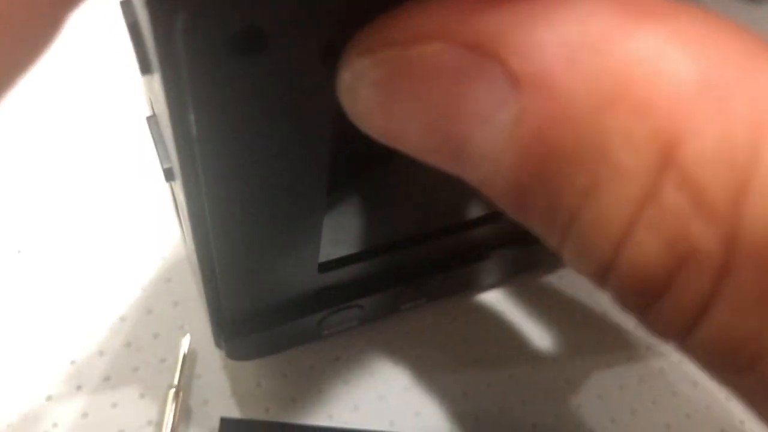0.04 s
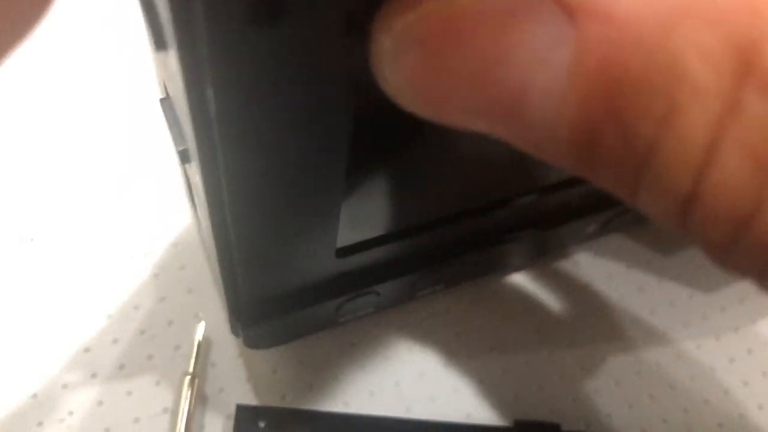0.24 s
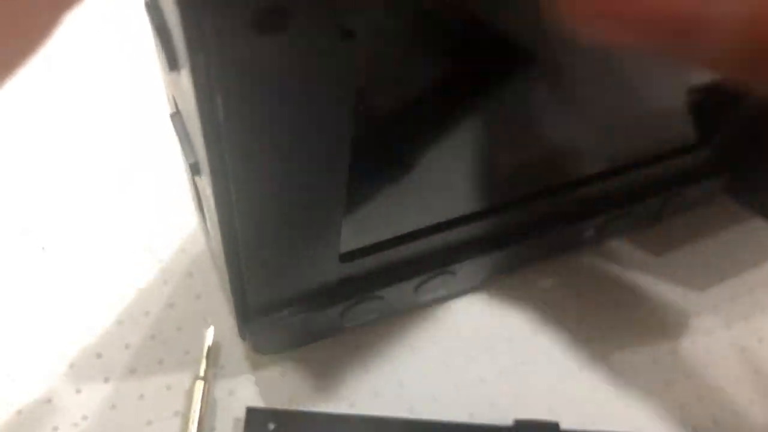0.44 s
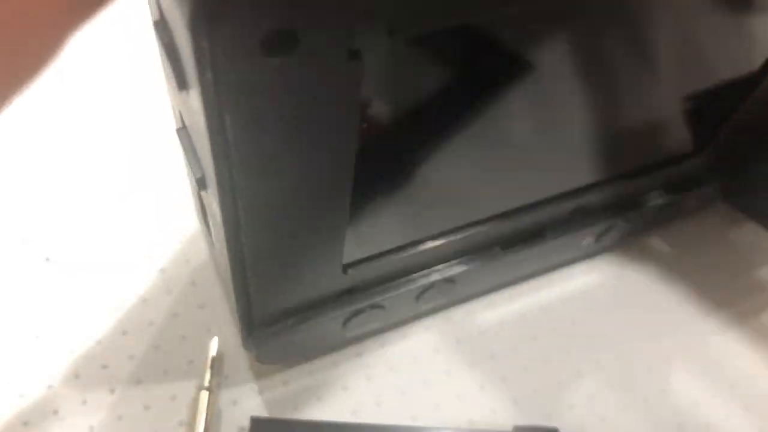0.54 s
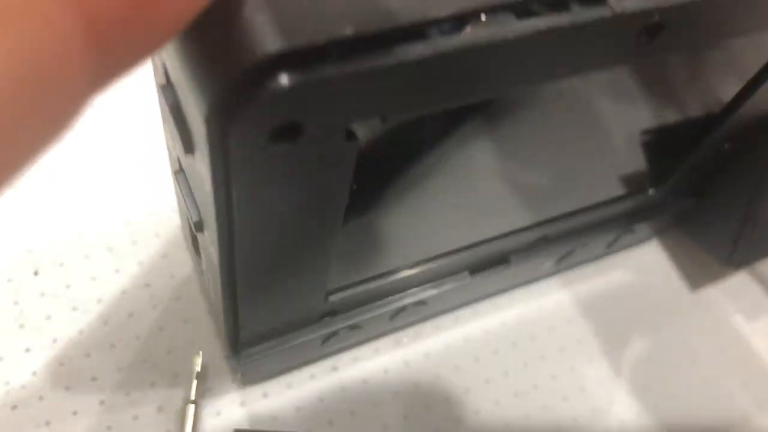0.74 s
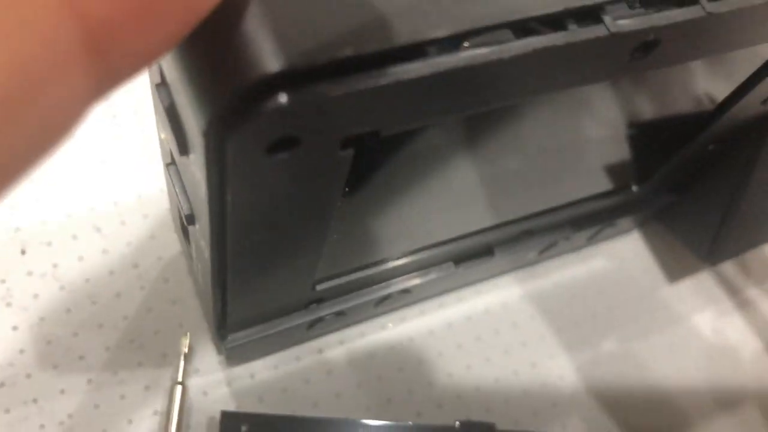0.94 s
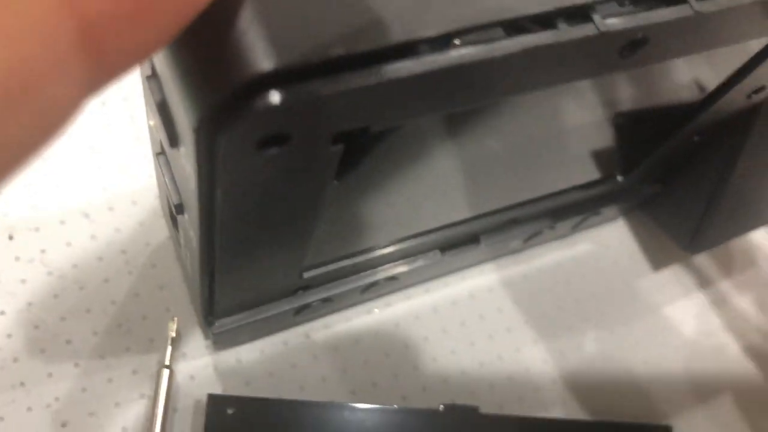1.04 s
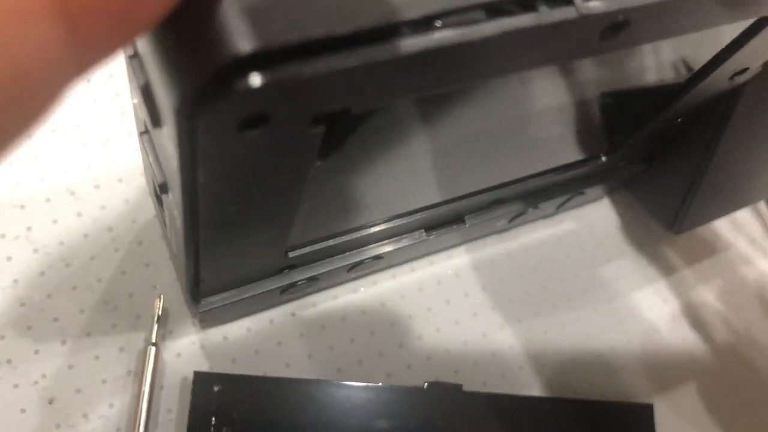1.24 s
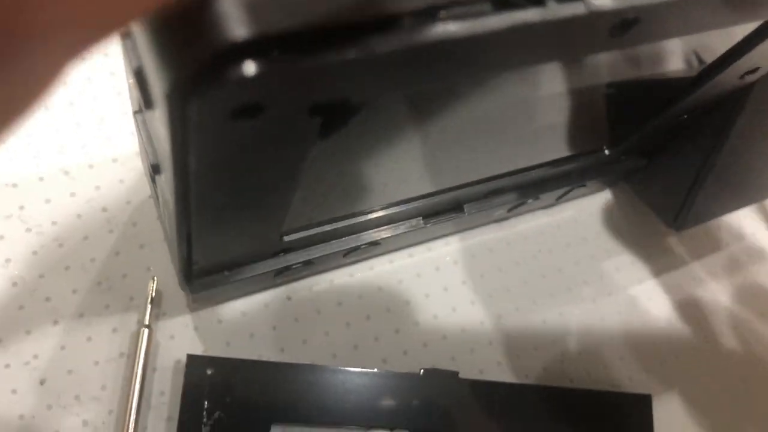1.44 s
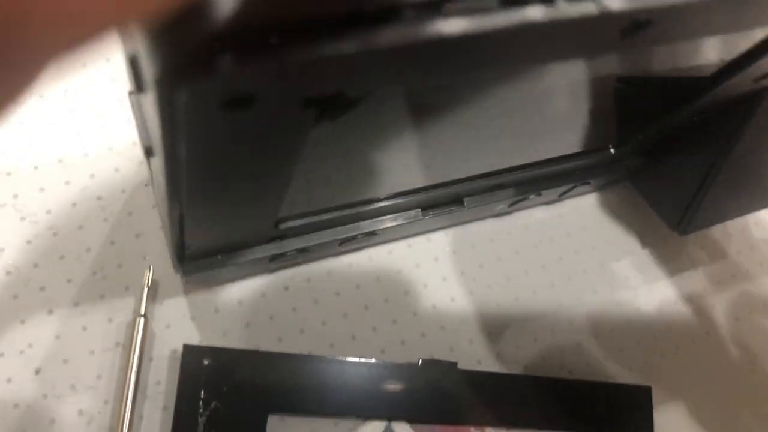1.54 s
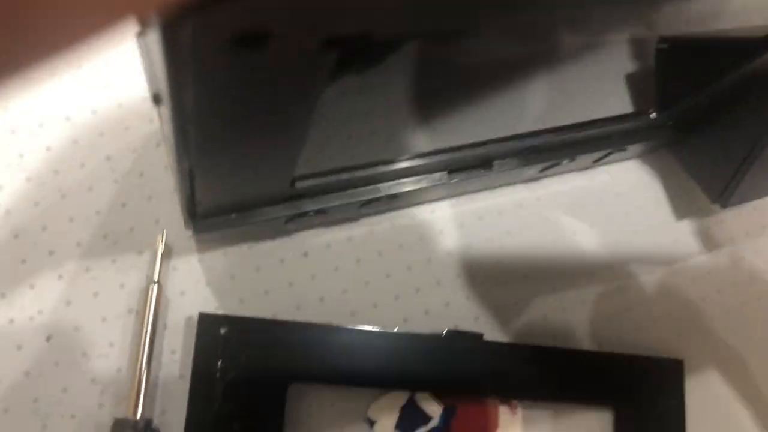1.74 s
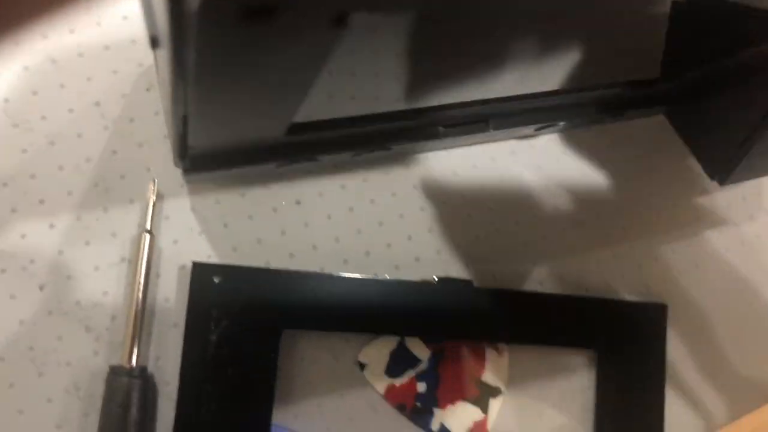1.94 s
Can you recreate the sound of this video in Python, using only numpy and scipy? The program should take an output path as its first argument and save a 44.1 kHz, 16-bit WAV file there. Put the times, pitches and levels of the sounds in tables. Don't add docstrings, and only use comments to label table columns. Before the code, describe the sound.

Plastic casing of a small device clicks, snaps and pops as fingers pry it apart

```python
import sys
import numpy as np
from scipy import signal
from scipy.fft import rfft, irfft, next_fast_len
from scipy.io import wavfile
from scipy.ndimage import uniform_filter1d

SR = 44100
rng = np.random.default_rng(int(sys.argv[2]) if len(sys.argv) > 2 else 0)


def voltage_ratio(decibels):
    exponent = np.asarray(decibels, float) / 20
    return 10 ** exponent


def dump(signal):
    limited = np.clip(np.atleast_2d(signal).T, -1, 1)
    pcm = np.round(limited * 32767).astype(np.int16)
    wavfile.write(sys.argv[1], SR, pcm)


N = 88200

# centre in Hz, width in Hz, level in dB.
CLIP_MODES = [(1199, 200, -14.5), (1844, 160, -6.5), (2164, 180, -0.5), (3223, 350, -2), (4825, 480, 5),
              (6036, 450, -1), (6920, 500, -11.5), (8314, 1200, -0.5), (9310, 750, -6.5), (10040, 350, -2),
              (11500, 610, -6.5), (12470, 550, -3.5), (14780, 350, -8), (15940, 400, -10)]
CATCH_MODES = [(910, 190, -2.5), (1770, 170, -11.5), (2272, 250, -0.5), (3234, 260, -6.5),
               (3720, 130, -7.5), (5100, 250, -7), (5700, 230, -8.5), (6400, 240, -13.5), (7510, 340, -10),
               (8840, 720, -10.5), (11000, 280, -22.5), (12420, 410, -14.5), (15400, 440, -20.5)]
LID_MODES = [(285, 150, -9.5), (495, 130, -5), (758, 260, -3), (1150, 220, -7.5), (1659, 220, -1),
             (2403, 150, -1), (2790, 380, 3), (3220, 300, -3), (5085, 910, 3.5), (7110, 440, -2),
             (8240, 500, 2), (10100, 1100, -1), (11675, 250, -0.5), (13645, 720, 0)]
BASE_MODES = [(386, 270, -6), (699.5, 450, 2.5), (1056, 300, -10), (1590, 250, -13), (1830, 140, -14.5),
              (2270, 370, -12.5), (5550, 500, -32)]
HOLLOW_MODES = [(227, 120, -4.5), (475.6, 120, -5), (614, 150, -9), (745, 150, -9), (1145, 133, 2),
                (1546, 120, -7), (1930, 400, -4), (2174, 124, -0.5)]
SHELL_MODES = [(2840, 790, -5), (3540, 440, -7), (4122, 170, -2.5), (5190, 290, -0.5), (5440, 180, 1),
               (5840, 180, 2), (6470, 310, -2.5), (6930, 570, -3), (8220, 400, -3), (9120, 480, -3),
               (10570, 720, -9.5), (11240, 670, -6), (13570, 800, -16)]
EDGE_MODES = [(1653, 280, 1.5), (2320, 350, 4.5), (3020, 400, 5.5), (3654, 400, 5.5), (4430, 420, 2),
              (5560, 500, -6), (6430, 600, -5), (7400, 450, -8.5), (8500, 600, -25), (9500, 530, -20),
              (11600, 810, -25)]
RIM_MODES = [(2380, 450, -1), (3190, 450, 1), (3900, 370, -1), (4700, 500, -1), (5900, 800, -8),
             (7600, 500, -7), (8900, 800, -11), (11500, 900, -20)]
# centre in Hz, width in Hz, level in dB.
PANEL_MODES = [(1750, 150, -8), (2250, 160, 1.5), (3250, 200, -3), (4650, 200, -2), (5570, 220, 1),
               (6040, 130, 4.5), (6970, 46, 3.5), (7310, 240, -5), (7900, 98, -9), (10140, 120, 1),
               (11400, 46, -8.5), (12600, 50, 0.5), (13700, 80, -3.5)]
BEZEL_MODES = [(750, 180, -3.5), (1850, 130, 2.5), (2200, 200, -3.5), (4490, 230, 2), (5150, 340, -3),
               (6560, 280, -5), (9150, 530, -5), (11500, 540, -15.5)]

# start in seconds, peak level in dB, chatter length in ms, tilt in dB per octave.
CLIP_SNAPS = [
    (.2155, -45.5, 1.2, 0.5),
    (.2278, -53, 1.2, 1),
    (.2365, -56, 0.69, -2.5),
    (.2497, -15.5, 2, 0.5),
    (.2535, -33, 1.6, -3.5),
]
CATCH_SNAPS = [
    (.0935, -51, 3.4, -2),
    (.1569, -32, 1.4, 0),
]
LID_POPS = [
    (.4324, -26.5, 3.4, -2.5),
    (.4368, -7.5, 2.5, .5),
    (.4402, -24.5, 1.3, -3.5),
    (.4525, -37, 5.4, -1),
]
BASE_KNOCKS = [
    (.358, -56.5, 13, 8),
    (.3840, -24, 3.27, -0.5),
    (.3895, -32.5, 3.3, 2.5),
    (.770, -49, 4.9, 5),
    (1.365, -56, 3.98, 0),
    (1.415, -45, 6.34, 9),
    (1.662, -55.5, 5.9, 0),
]
HOLLOW_CLACKS = [
    (.770, -51, 6.1, 0.16),
    (1.414, -54, 8.5, 1),
    (1.7243, -43.5, 3.3, 1),
    (1.7398, -18.5, 2.63, 0.38),
    (1.7495, -36, 2.9, -2),
]
SHELL_CLACKS = [
    (1.416, -63.5, 5.14, -0.1),
    (1.7243, -50, 2.4, 0),
    (1.7392, -21, 1.44, 0.62),
    (1.7418, -30.5, 1.9, -2.9),
    (1.7495, -44.5, 3, -2.3),
]
EDGE_TICKS = [
    (1.2068, -61.5, 3.4, 1),
    (1.3660, -58, 3.5, -5.5),
    (1.6629, -35, 4, -1),
]
RIM_TICKS = [
    (1.7675, -47.5, 3, 2),
    (1.8175, -49, 2.9, 2),
    (1.829, -51, 3, 4),
    (1.9812, -41.5, 4.1, -2.5),
]
LID_TICKS = [
    (.0265, -58.5, 2.7, 4),
    (.034, -63, 2, 4),
    (.047, -61, 2.2, 4),
    (.0795, -60, 3.5, 1),
    (.102, -67, 3, 2),
    (.268, -44, 4.4, 1),
    (.415, -44, 6, 1),
]

# start in seconds, length in seconds, level in dB, tilt in dB per octave.
STROKES = [(.001, 0.12, -67, -6.5), (.02, 0.07, -72, 11), (0.167, 0.058, -90, 7), (0.259, 0.068, -62, -2.5),
           (0.315, 0.12, -62, -3.5), (0.346, 0.081, -60.5, -13), (0.388, 0.072, -53.5, -4),
           (0.783, 0.037, -66.5, -3), (0.888, 0.038, -72.5, -4), (0.954, 0.014, -67.5, -6.5),
           (0.992, .02, -69.5, -6.5), (1.108, 0.089, -66, -4), (1.239, 0.066, -60, -6),
           (1.408, 0.013, -59.5, -9.5), (1.669, 0.06, -63, -4), (1.729, 0.0064, -57.5, -4),
           (1.759, 0.071, -56.5, -4.5), (1.818, 0.092, -62.5, -5.5), (1.882, 0.045, -52.5, -1.5),
           (1.9, .07, -64.5, -3), (1.967, 0.064, -60.5, -5)]
# time in seconds, level in dB.
THUMB_SLIDE = [
    (0.46, -61),
    (0.508, -56.5),
    (0.638, -49.5),
    (0.702, -52),
    (0.75, -59.5),
    (0.768, -60),
    (0.782, -80),
]
# start in seconds, level in dB, pitch in Hz.
TABLE_PUSHES = [
    (0.091, -66.5, 69),
    (.386, -58, 90),
    (0.438, -55, 75),
    (1.75, -56, 103),
]
# start in seconds, centre in Hz, level in dB, 60 dB decay in seconds.
PANEL_BUZZES = [
    (.255, 2250, -55, 0.28),
    (.39, 750, -55, 0.2),
    (.443, 645, -51, 0.35),
    (0.444, 1720, -55, .3),
    (.443, 2720, -57, .35),
    (0.444, 3750, -51, .4),
    (1.104, 4500, -71.5, 0.35),
    (1.75, 2000, -59.5, 0.55),
    (1.75, 470, -54, 0.19),
    (1.75, 1150, -56, 0.24),
]

# frequency in Hz, 60 dB decay in seconds.
ROOM_DECAY = [(200, 0.12), (800, 0.24), (2200, 0.37), (5000, 0.38), (14000, 0.13)]
# frequency in Hz, level in dB.
ROOM_COLOUR = [(200, 9), (600, 5), (1200, -10), (2200, 0.2), (3700, -2.1), (5000, -6), (14000, -2)]
# frequency in Hz, spectral density in dB per Hz.
ROOM_HUM = [(25, -21), (75, -4), (260, -5.5), (320, -11.5), (2100, -18), (2700, -28), (7000, -34.5),
            (15000, -41.5)]


def unit(x):
    return x / np.sqrt(np.mean(x ** 2) + 1e-20)


def along(points, hz):
    f, v = np.transpose(points)
    return np.interp(np.log(hz + 1), np.log(f + 1), v)


def filtered(x, response):
    m = next_fast_len(len(x) + 4096)
    return irfft(rfft(x, m) * response(np.fft.rfftfreq(m, 1 / SR)), m)[:len(x)]


def add(track, s, x):
    part = track[max(round(s * SR), 0):][:len(x)]
    part += x[:len(part)]


def tilted(hz, tilt_db):
    return voltage_ratio(tilt_db * np.log2((hz + 30) / 3000))


def patchy(n, patchy_db, size):
    z = signal.stft(rng.standard_normal(n + 512), nperseg=256)[2]
    field = uniform_filter1d(rng.standard_normal(z.shape), size, 0)
    field = uniform_filter1d(field, size, 1)
    return signal.istft(z * voltage_ratio(patchy_db * unit(field)), nperseg=256)[1][:n]


def strikes(contacts, modes):
    lag_cycles, rise_cycles, min_width_hz = 1.252, 0.81, 180
    crack_db, crack_t60 = -6.5, 0.011
    rattle_db, rattle_t60, rattle_tilt_db = -14.5, 0.04, -3.5
    out, t = np.zeros(N), np.arange(SR // 12) / SR
    hz, width, level_db = np.transpose(modes)[:, :, None]
    width = np.maximum(width, min_width_hz)
    lag = lag_cycles / hz
    for s, db, chatter_ms, tilt_db in contacts:
        span, tilt_db = chatter_ms / 1000, np.clip(tilt_db, -4, 4)

        late = np.clip(t - lag - span * 0.22 * rng.random(hz.shape), 0, None)
        free = np.clip(t - lag - span * 0.73, 0, None)
        swell = (1 - np.exp(-late * hz / rise_cycles)) * np.exp(-np.pi * width * free)
        gain = voltage_ratio(level_db + rng.normal(0, 0.8, hz.shape)) * np.sqrt(width / 300) * tilted(hz, tilt_db)
        ring = np.sum(gain * swell * np.sin(2 * np.pi * hz * late), axis=0)

        def colour(f):
            resonance = gain * f / (np.abs(hz ** 2 - f ** 2) + f * width)
            return np.sqrt(np.sum(resonance ** 2, axis=0))

        after = np.clip(t - span, 0, None)
        crack = unit(filtered(rng.standard_normal(len(t)), colour))
        crack = crack * voltage_ratio(crack_db - 60 * after / crack_t60)
        rattle = patchy(len(t), 0.89, size=3)
        rattle = unit(filtered(rattle, lambda f: colour(f) * tilted(f, rattle_tilt_db)))
        rattle = rattle * voltage_ratio(rattle_db - 60 * after / rattle_t60)
        noise = (crack + rattle) * np.clip(t * 4000, 0, 1)
        hit = ring / np.abs(ring).max() + noise / 2
        add(out, s, voltage_ratio(db) * hit / np.abs(hit).max())
    return out


def scrape(n, tilt_db, modes):
    grain_db, surface_share = 3, 0.58

    def response(f):
        surface = np.abs(sum(voltage_ratio(db) * f * w / (c * c - f * f + 1j * f * w) for c, w, db in modes))
        low_cut = f ** 2 / (f ** 2 + 700 ** 2)
        return (surface_share * surface + 1 - surface_share) * tilted(f, tilt_db) * low_cut

    return unit(filtered(patchy(n, grain_db, size=3), response))


def rubbing():
    rise_share = 0.19
    s, db = np.transpose(THUMB_SLIDE)
    times, levels = np.r_[s[0] - 0.02, s, s[-1] + 0.015], np.r_[-100, db, -100]
    out = scrape(N, 0.54, PANEL_MODES) * voltage_ratio(np.interp(np.arange(N) / SR, times, levels))
    for s, length, db, tilt_db in STROKES:
        u = np.linspace(0, 1, round(length * SR))
        ramp = np.minimum(u / rise_share, (1 - u) / (1 - rise_share))
        stroke = np.sin(np.pi / 2 * np.clip(ramp, 0, 1))
        add(out, s, voltage_ratio(db) * stroke * scrape(SR // 8, tilt_db, BEZEL_MODES)[:len(u)])
    return out


def buzzes():
    half_width_hz = 240
    out, t = np.zeros(N), np.arange(SR // 4) / SR
    fade = np.clip(t * 200, 0, 1) * np.clip(5 - t * 20, 0, 1)
    for s, hz, db, t60 in PANEL_BUZZES:
        band = filtered(rng.standard_normal(len(t)), lambda f: 1 / (1 + ((f - hz) / half_width_hz) ** 2))
        add(out, s, unit(band) * voltage_ratio(db - 60 * t / t60) * fade)
    return out


def thumps():
    decay_cycles = 14
    out, t = np.zeros(N), np.arange(SR // 5) / SR
    for s, db, hz in TABLE_PUSHES:
        swell = voltage_ratio(db - 60 * t * hz / decay_cycles) * (1 - np.exp(-t * hz))
        add(out, s, swell * 4 * np.sin(2 * np.pi * hz * t))
    return out


def room(x):
    gap_s, stretch = 0.014, 4410
    out = np.zeros(N)
    for start in range(0, N, stretch):
        hz, t, z = signal.stft(rng.standard_normal(SR // 2), SR, nperseg=128)
        decay_db = 60 * t / along(ROOM_DECAY, hz)[:, None]
        z = z * voltage_ratio(along(ROOM_COLOUR, hz)[:, None] - decay_db)
        tail = signal.istft(z, SR, nperseg=128)[1]
        answer = signal.fftconvolve(x[start:start + stretch], tail / np.linalg.norm(tail))
        add(out, start / SR + gap_s, answer)
    return out


def room_tone():
    return voltage_ratio(-64.5) * unit(filtered(patchy(N, 0.51, size=9), lambda f: voltage_ratio(along(ROOM_HUM, f))))


def scene():
    room_db, low_cut_hz, hiss_top_hz = -21, 45, 15750
    contacts = [(CLIP_SNAPS, CLIP_MODES), (CATCH_SNAPS, CATCH_MODES), (LID_POPS, LID_MODES),
                (BASE_KNOCKS, BASE_MODES), (HOLLOW_CLACKS, HOLLOW_MODES), (SHELL_CLACKS, SHELL_MODES),
                (EDGE_TICKS, EDGE_MODES), (RIM_TICKS, RIM_MODES), (LID_TICKS, LID_MODES)]
    clicks = sum(strikes(*pair) for pair in contacts)
    rubs = rubbing()
    soft = rubs + buzzes() + voltage_ratio(room_db) * room(clicks + rubs) + thumps()
    near = clicks + filtered(soft, lambda hz: hz < hiss_top_hz)
    near = filtered(near, lambda hz: hz ** 2 / (hz ** 2 + low_cut_hz ** 2))
    return (near + filtered(room_tone(), lambda hz: hz < hiss_top_hz))[None]


def top_cut(x):
    return signal.sosfilt(signal.butter(12, 16830, fs=SR, output="sos"), x)


def record(dry):
    top_hz, slope_hz = 16800, 900
    mix = filtered(dry[0], lambda hz: np.clip((top_hz - hz) / slope_hz, 0, 1) ** 2)[None]
    return top_cut(mix)


dry = scene()
out = record(dry)
dump(out)
```